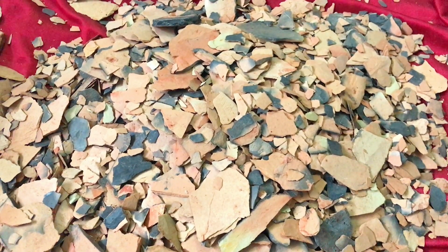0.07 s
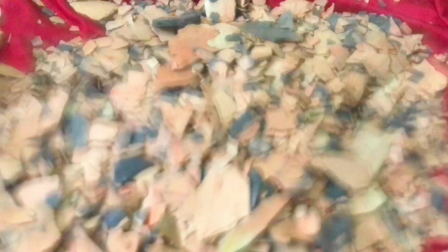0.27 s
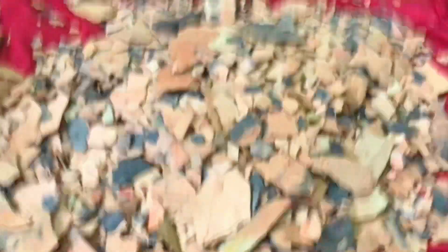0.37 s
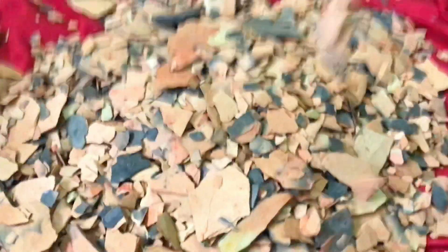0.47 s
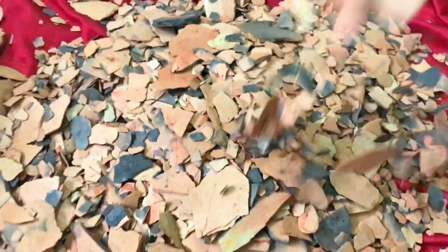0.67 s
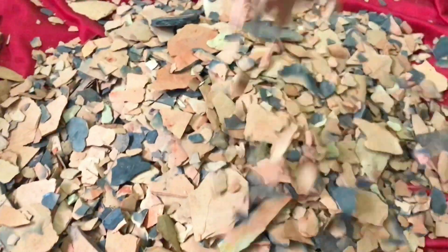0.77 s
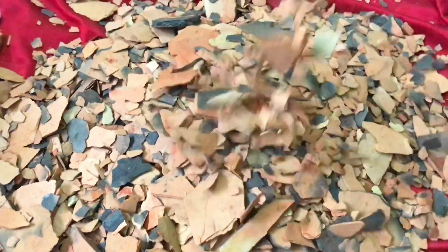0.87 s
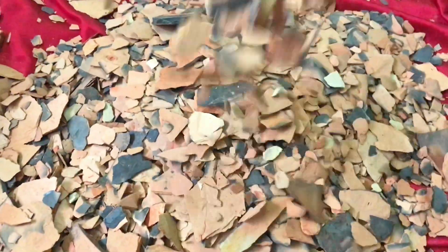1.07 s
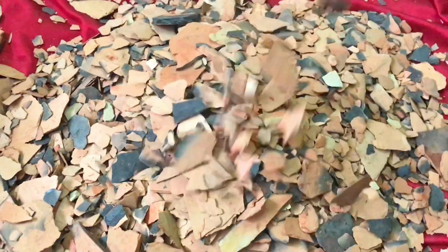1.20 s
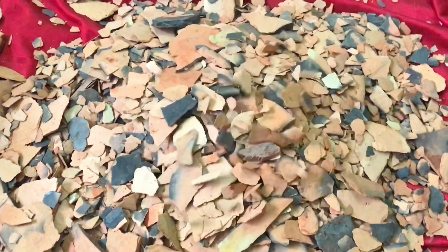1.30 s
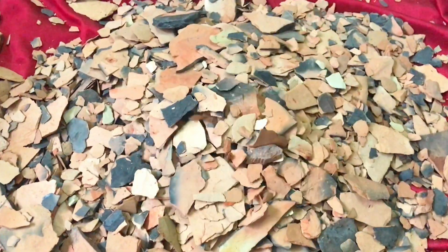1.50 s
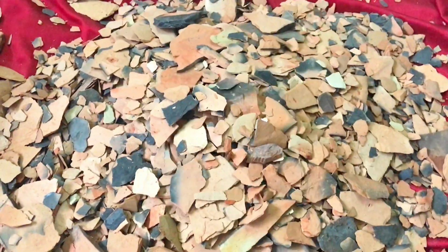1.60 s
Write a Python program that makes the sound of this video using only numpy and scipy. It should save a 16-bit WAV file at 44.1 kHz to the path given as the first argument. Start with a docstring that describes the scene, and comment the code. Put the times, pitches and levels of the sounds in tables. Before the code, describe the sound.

Dry clay shards clatter and clink as they drop onto a heap, close up.

```python
"""Clay shards on a heap, close up

Dry shards drop onto a heap right by the microphone: single clinks, then two pours that slide and
settle. Each clink is a brittle crack plus the short ring of one plate. A thick slab and a hollow
knock come before the fall; a lighter knock lands within it. The room adds a faint, short tail.
Behind the heap lie a thin drone and a low hum in rumble, which dips while the clatter lasts."""
import sys
import numpy as np
from scipy import signal
from scipy.fft import rfft, irfft
from scipy.io import wavfile
from scipy.ndimage import uniform_filter1d

SR = 44100
rng = np.random.default_rng(int(sys.argv[2]) if len(sys.argv) > 2 else 0)


def master(y):
    """Save y as 16-bit WAV."""
    cut = np.clip(np.atleast_2d(y).T, -1, 1)
    pcm = np.round(cut * 32767)  # scale
    wavfile.write(sys.argv[1], SR, pcm.astype(np.int16))


N = 72765
T = np.arange(round(.17 * SR)) / SR  # time within one contact, t/s
PIVOT_HZ = 5960  # reference for spectral tilts and ring times


def amp(db):
    """Decibels to gain."""
    return 10 ** (np.asarray(db) / 20)


def unit_rms(x):
    """Scales to rms 1."""
    return x / np.sqrt(np.mean(x ** 2) + 1e-20)


def smooth_noise(length, width):
    """Random wander of rms 1, averaged over width points."""
    return unit_rms(uniform_filter1d(rng.standard_normal(length), size=width))


def envelope(points):
    """Gain across the scene from points of t/s, level/dB."""
    return amp(np.interp(np.arange(N) / SR, *np.transpose(points)))


def add(mix, start, sound):
    """Mixes a sound in at start seconds."""
    part = mix[max(round(start * SR), 0):][:len(sound)]
    part += sound[:len(part)]


def fade(t60):
    """Exponential decay, 60 dB down after t60 seconds."""
    return np.exp(-np.log(1000) * T / max(t60, 1e-3))


def ring(hz, t60):
    """One dying mode."""
    return np.sin(2 * np.pi * hz * T) * fade(t60) * (hz < SR / 2)


def body(modes, bulk=1):
    """Modes of alternating sign; a bulkier body rings lower and longer."""
    return sum((-1) ** k * amp(db) * ring(hz / bulk, t60 * bulk)
               for k, (hz, db, t60) in enumerate(modes))


def colour(x, spectrum, tilt_db=0, ripple_db=0, size=2048):
    """Causal filter of unit power from a spectrum, a tilt per octave and random ripple."""
    hz = np.maximum(np.fft.rfftfreq(size, 1 / SR), 1)
    point_hz, point_db = np.transpose(spectrum)
    db = np.interp(np.log(hz), np.log(point_hz), point_db)
    db += tilt_db * np.log2(np.maximum(hz, point_hz[0]) / PIVOT_HZ)
    db += ripple_db * smooth_noise(len(hz), 20)
    cepstrum = irfft(np.log(unit_rms(amp(db))))
    cepstrum[1:size // 2] *= 2  # fold to minimum phase
    cepstrum[size // 2 + 1:] = 0
    return signal.fftconvolve(x, irfft(np.exp(rfft(cepstrum))))[:len(x)]


def crack(t60, grain_db=3.5):
    """A dying burst of tiny contacts between rough edges."""
    noise = rng.standard_normal(len(T))
    grain = amp(grain_db * np.clip(smooth_noise(len(T), 24), -2, 2))
    burst = noise * grain * fade(t60)
    return burst * np.linalg.norm(fade(t60)) / np.linalg.norm(burst)


def plate(hz, t60, detune=0.013, twin_db=-14):
    """An uneven plate splits its ring into a beating pair, under one brief overtone."""
    twin = amp(twin_db) * ring(hz * (1 + detune * rng.choice([-1, 1])), t60)
    pair = (ring(hz, t60) + twin) / (1 + amp(twin_db) / 2)
    overtone = amp(-11) * ring(hz * rng.uniform(2.3, 2.325), t60 / 2.5)
    return pair + overtone


def rattle(depth_db=1.43, rate_hz=160):
    """A plate touches its neighbours, so the level of its ring flutters."""
    knots = np.clip(rng.standard_normal(200), -2, 2)
    return amp(depth_db * np.interp(T * rate_hz, np.arange(len(knots)), knots))


# Brittle clay cracking at close range: f/Hz, relative level/dB
CRACK_SPECTRUM = [(200, -43), (500, -25.5), (1000, -15), (2000, -8.5), (3200, -1.5), (5500, 3), (8000, 0.5),
                  (11000, 1), (15500, 2.5)]
# Shards landing by the microphone: t/s, crack level/dB, tilt/(dB/octave), ring f/Hz, ring level/dB
SHARD_LANDINGS = [(0.016, -23, -1, 8360, -28.5), (.245, -16, 5, 3500, -43), (.273, -18, 11, 13200, -17),
                  (.287, -23, 5, 13700, -27), (.310, -42, -2, 7370, -35), (.3455, -40, -3, 13750, -28),
                  (0.387, -26.5, 1.5, 8550, -31), (.421, -18.5, 1, 14100, -18.5),
                  (0.4703, -15.5, -2, 5770, -16), (0.474, -18, 0, 10800, -14), (0.4818, -7, 7.5, 7180, -16),
                  (.491, -33, -10, 13400, -17), (0.5078, -8.5, 0, 9760, -10.5), (.509, -34, 2, 3144, -18),
                  (.516, -16.5, -6, 3370, -29), (0.5414, -9.5, 4, 7160, -12.5),
                  (0.5466, -15.5, -1.5, 7110, -8.5), (0.5958, -14, -0.5, 4420, -25),
                  (.601, -11.5, -0.5, 3160, -14), (.606, -33, 11, 2160, -26), (.633, -19, 4, 4420, -18),
                  (0.6376, -5.5, 4, 9800, -16), (0.649, -13, 1.5, 7140, -14), (.664, -8, 4, 9440, -13),
                  (0.67, -8.5, -0.5, 4510, -10.5), (.677, -11, -1, 5590, -14), (.683, -14, -2.5, 4050, -14),
                  (.688, -13, 1, 8940, -10.5), (.702, -8, 5, 12460, -7), (0.704, -17.5, -3.5, 9050, -11),
                  (0.719, -13, -2.5, 3130, -22), (.728, -29, -9.5, 5790, -13.5),
                  (0.7562, -16, -4.5, 6800, -8), (0.7565, -36, 7, 9860, -7.5),
                  (.757, -19, -3.5, 3165, -17.5), (0.789, -15, -4, 3182, -17.5),
                  (0.7961, -16, -2.5, 3134, -15), (0.811, -21, -3.5, 3180, -19),
                  (0.8245, -12.5, 0, 4630, -14.5), (.842, -8, -1, 10300, -30),
                  (0.8465, -11, 1.5, 4080, -19), (.860, -17, 4, 5170, -11.5), (0.864, -14, 3, 6800, -11),
                  (.885, -22, -1, 6430, -16), (0.923, -37, -4, 6570, -18.5), (0.939, -27, 7, 9540, -15.5),
                  (0.963, -12, 5, 5210, -20), (0.968, -12, 4, 4040, -25), (1.011, -16.5, -1.5, 6700, -29),
                  (1.047, -25, -2.5, 6770, -31), (1.065, -12.5, 0.5, 7350, -13),
                  (1.0707, -17, 2, 14000, -16), (1.0903, -30, -8.5, 3210, -22.5),
                  (1.1125, -9, 0, 9740, -15), (1.137, -8.5, -1, 3000, -18), (1.16, -8, 2, 4030, -19),
                  (1.169, -17, 3, 9480, -8.5), (1.18, -6, 7, 6750, -11.5), (1.201, -11, 9, 2845, -21),
                  (1.2128, -23, 9, 6930, -13.5), (1.2455, -6.5, 6, 7860, -32), (1.258, -26, 5, 6320, -10.5),
                  (1.272, -18, 5, 3980, -20), (1.2778, -7.5, 5, 4510, -19), (1.313, -35, 5, 4025, -31.5),
                  (1.326, -25, -0.5, 4550, -34), (1.3915, -30, -1.5, 6680, -22.5),
                  (1.478, -30, 0, 7900, -33), (1.571, -35.5, -3, 9140, -28.5),
                  (1.6068, -34.5, -7, 7860, -32.5)]


def clinks():
    """Each large shard cracks against the heap and rings in a few plate modes."""
    out = np.zeros(N)
    for start, crack_db, tilt_db, hz, ring_db in SHARD_LANDINGS:
        t60 = 0.043 * (PIVOT_HZ / hz) ** 0.71  # higher rings die sooner
        if 1.265 < start < 1.36:  # the last big plates lie free on top and ring longer
            t60 *= 2.27
        ringing = amp(ring_db) * plate(hz, t60)
        contact = amp(crack_db) * colour(crack(t60=0.035), CRACK_SPECTRUM, tilt_db, ripple_db=4.5)
        add(out, start, contact + ringing * rattle())
    return out


# Edge striking edge on the heap: t/s, level/dB
EDGE_SNAPS = [(0.3276, -27), (0.378, -30), (0.464, -27), (0.4734, -6), (.674, -17), (0.756, -4),
              (.797, -4.5), (0.8417, -4.5), (.8485, -1), (1.061, -7), (1.0683, -2), (1.1023, -3),
              (1.1055, -2.5), (1.116, -6.5), (1.156, -9), (1.1602, -11), (1.184, -8), (1.1864, -9),
              (1.2023, -7.5), (1.2506, -9), (1.3772, -39)]


def snaps():
    """Edges meet in very short, bright contacts without a ring."""
    out = np.zeros(N)
    for start, db in EDGE_SNAPS:
        add(out, start, amp(db) * colour(crack(t60=0.011), CRACK_SPECTRUM, tilt_db=2.5, ripple_db=2))
    return out


# Small chips heard close up: f/Hz, relative level/dB
CHIP_SPECTRUM = [(250, -65.5), (550, -12), (1200, -13), (2200, -5), (3200, -0.5), (4500, -2), (8000, -1.5),
                 (11000, -0.5), (15500, 0.5)]
# Strength of the pour onto the heap: t/s, level/dB
POUR_LEVEL = [(0, -51), (.09, -52), (.13, -53.5), (.21, -51.5), (.30, -44), (.41, -52.5), (.46, -37.5),
              (.52, -30.5), (.62, -29), (.68, -17.5), (.715, -21.5), (.745, -32), (.81, -25.5), (.858, -13),
              (.91, -21.5), (.965, -24.5), (.995, -32), (1.05, -22.5), (1.085, -27), (1.165, -15.5),
              (1.225, -20), (1.275, -20.5), (1.305, -29.5), (1.37, -35.5), (1.45, -40), (1.65, -48)]


def pour(shapes=140, hits_each=10):
    """Small chips of many shapes, each with its own colour and ring, collide at random."""
    out = np.zeros(N)
    for _ in range(shapes):
        modes = sum(ring(hz, 0.031 * np.sqrt(PIVOT_HZ / hz)) for hz in rng.uniform(3500, 16000, 3))
        contact = crack(t60=0.0083) + amp(-11) * modes
        chip = colour(contact[:2048], CHIP_SPECTRUM, ripple_db=4.5)
        for when, chance in rng.random((hits_each, 2)):
            accent_db = -2.5 * np.log(max(chance, .05))  # a few hits stand out
            add(out, when * N / SR, amp(accent_db) * chip)
    return unit_rms(out) * envelope(POUR_LEVEL)


# The dull sound of a flat landing: f/Hz, relative level/dB
TAP_SPECTRUM = [(150, -39), (500, -8), (1400, -1.5), (2000, -4.5), (2900, -1), (4500, -7), (9000, -19.5),
                (16000, -16.5)]
# Pieces landing flat near the microphone: t/s, level/dB
FLAT_LANDINGS = [(0.0433, -24), (0.0669, -28), (0.08, -23.5), (.298, -31), (0.3042, -37), (0.3241, -19),
                 (0.3535, -29), (.378, -19.5), (0.414, -31.5), (.451, -26.5), (0.54, -15.5), (.578, -18.5),
                 (.672, -26.5), (.683, -25), (0.796, -21.5), (0.8549, -20), (1.027, -31), (1.0677, -26),
                 (1.101, -26), (1.138, -19.5), (1.178, -28), (1.249, -31), (1.461, -29)]


def taps():
    """Pieces that land flat are damped and do not ring."""
    out = np.zeros(N)
    for start, db in FLAT_LANDINGS:
        add(out, start, amp(db) * colour(crack(t60=0.013), TAP_SPECTRUM, ripple_db=2))
    return out


# A thick slab chattering on the heap: t/s, level/dB relative to crack_db
SLAB_CHATTER = [(0.2195, -5), (.2213, 3), (0.2269, -1.5), (0.2336, -13)]
# Its modes: f/Hz, level/dB relative to ring_db, t60/s
SLAB_MODES = [(470, -1.5, 0.067), (636, 2, 0.024), (1291, 4, 0.036), (3340, -5, 0.049), (5060, 1, 0.042)]


def slab(crack_db=-11, ring_db=-16):
    """A thick piece clacks down in quick, rough cracks; the hardest sets it ringing."""
    out = np.zeros(N)
    for start, db in SLAB_CHATTER:
        add(out, start, amp(crack_db + db) * colour(crack(t60=0.027), TAP_SPECTRUM, tilt_db=4.5))
    add(out, SLAB_CHATTER[1][0], amp(ring_db) * body(SLAB_MODES))
    return out


# Hollow knocks close by: t/s, clack level/dB, clack t60/s, bulk/ratio, body level/dB, tilt/(dB/octave)
HOLLOW_KNOCKS = [(0.2653, -3.5, 0.018, 1, -5.5, -2.5), (0.8762, -20, .01, 0.342, -14.5, 3)]
# Their clack: f/Hz, relative level/dB
CLACK_SPECTRUM = [(25, -17), (100, -12), (500, -3.5), (900, -5), (1500, 2.5), (1850, 0), (2300, -3),
                  (2650, 2), (3150, -6), (3650, -3), (4600, -6), (16000, -8.5)]
# The hollow body at bulk 1: f/Hz, relative level/dB, t60/s
HOLLOW_MODES = [(140, -24, 0.026), (205, -17.5, 0.15), (255, -0.5, 0.027), (395, -1, 0.035),
                (666, -9.5, 0.034)]


def knocks(body_lag_s=0.00271):
    """A clack followed by the low modes of a hollow body."""
    out = np.zeros(N)
    for start, db, t60, bulk, body_db, tilt_db in HOLLOW_KNOCKS:
        add(out, start, amp(db) * colour(crack(t60), CLACK_SPECTRUM, tilt_db))
        add(out, start + body_lag_s, amp(body_db) * body(HOLLOW_MODES, bulk))
    return out


def room(near, level_db=-15, delay_s=.004):
    """The room's faint, short tail reaches the microphone just after the direct sound."""
    tail = rng.standard_normal(len(T)) * fade(t60=0.089) * (T > delay_s)
    return amp(level_db) * signal.fftconvolve(near, tail / np.linalg.norm(tail))[:N]


# The hum behind the heap: harmonic number, relative level/dB
HUM_HARMONICS = [(3, -1.5), (4, 2.5), (6, -9), (10, -10.5)]
# Its dip under the clatter: t/s, level/dB
HUM_DIP = [(0, -32.5), (.2, -65), (.4, -52), (1.15, -50), (1.33, -41), (1.41, -40.5), (1.6, -31.5)]


def hum(base_hz=37.42, waver=0.021):
    """Low harmonics of an absent fundamental waver together in pitch."""
    turns = np.cumsum(base_hz * (1 + waver * smooth_noise(N, 2500))) / SR
    tone = sum(amp(db) * np.sin(2 * np.pi * (k * turns + rng.random())) for k, db in HUM_HARMONICS)
    return unit_rms(tone) * envelope(HUM_DIP)


# Rumble at the back of the room: f/Hz, relative level/dB
RUMBLE_SPECTRUM = [(25, -23), (55, 6), (140, 0.5), (290, -4), (520, -7.5), (750, -15), (1200, -16),
                   (3000, -23), (8000, -36.5), (16000, -64)]
# Its dip under the clatter: t/s, level/dB
RUMBLE_DIP = [(0, -38), (.19, -34.5), (.31, -47), (.9, -49.5), (1.35, -47.5), (1.47, -39), (1.58, -32.5),
              (1.65, -36.5)]


def rumble():
    """Deep noise around the hum."""
    noise = colour(rng.standard_normal(N), RUMBLE_SPECTRUM, size=8192)
    return unit_rms(noise) * envelope(RUMBLE_DIP)


def drone(hz=392.4, level_db=-51.5):
    """Noise in one resonance: a steady, fuzzy band above the hum."""
    noise = rng.standard_normal(N + len(T) - 1)
    return amp(level_db) * unit_rms(signal.fftconvolve(noise, ring(hz, t60=0.2), "valid"))


def scene():
    """One microphone: the heap up close, the room around it, the hum behind."""
    near = clinks() + snaps() + taps() + slab() + knocks() + pour()
    return (near + room(near) + hum() + rumble() + drone())[None]


def record(dry, low_cut_hz=65, high_cut_hz=15780):
    """The microphone sheds the deepest bass; peaks are softly rounded and the top treble is cut."""
    lean = signal.sosfilt(signal.butter(2, low_cut_hz, "high", fs=SR, output="sos"), dry)
    rounded = lean / (1 + lean ** 6) ** (1 / 6)
    band_limit = signal.firwin(511, high_cut_hz, window=("kaiser", 9), fs=SR)
    return signal.oaconvolve(rounded, band_limit[None], "same")


dry = scene()
out = record(dry)
master(out)
```